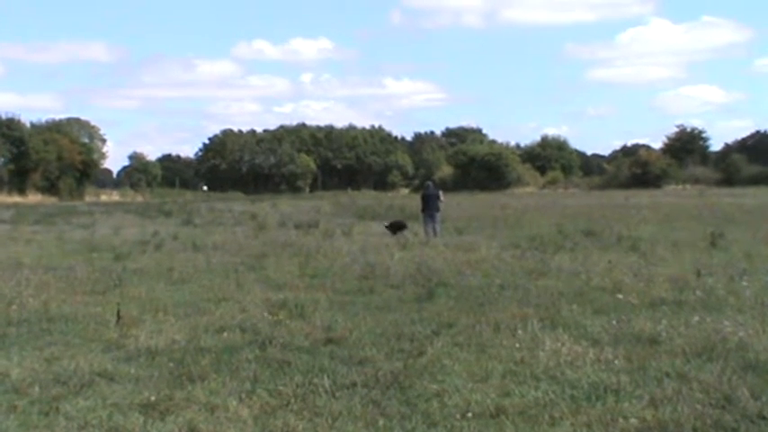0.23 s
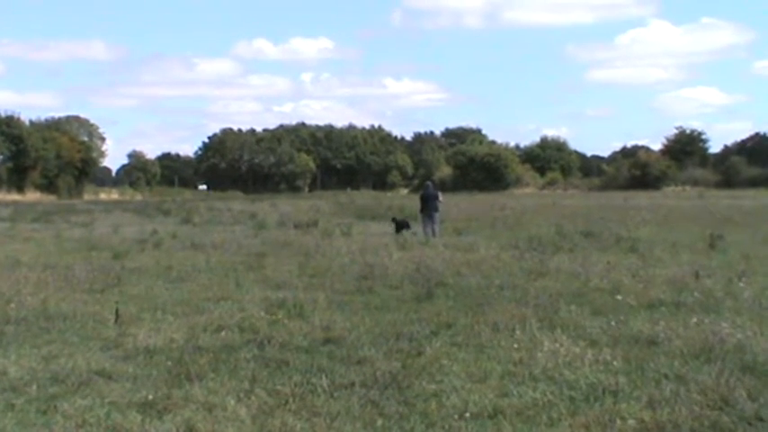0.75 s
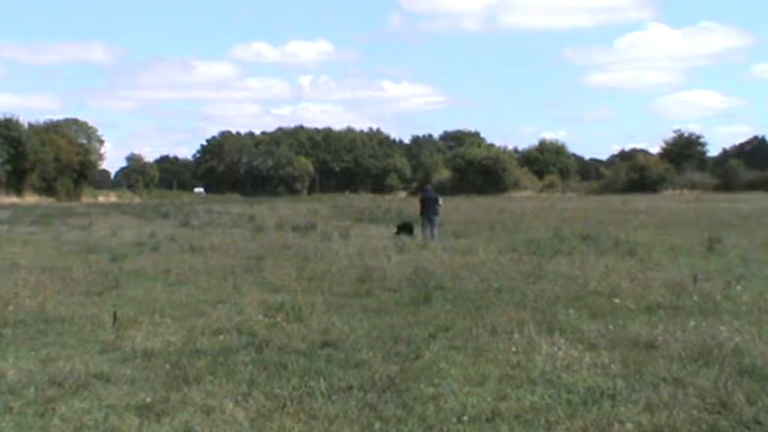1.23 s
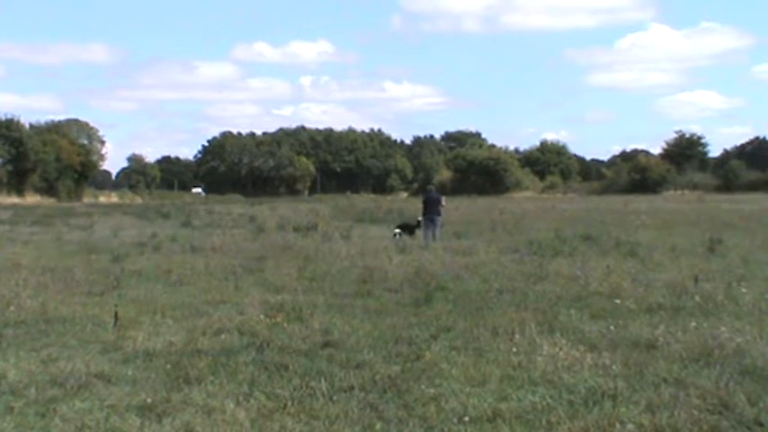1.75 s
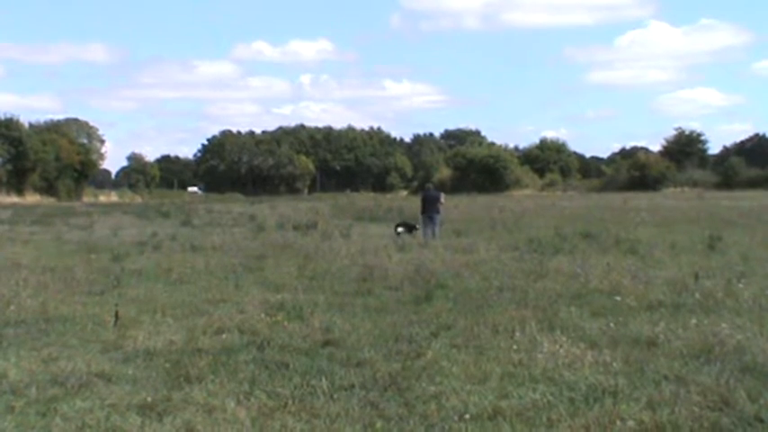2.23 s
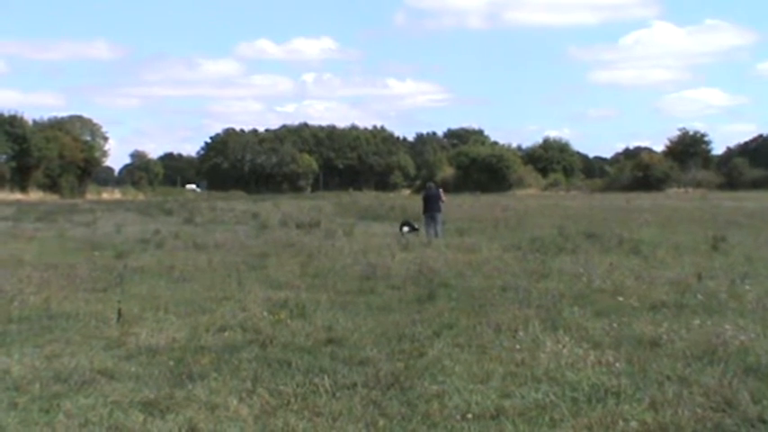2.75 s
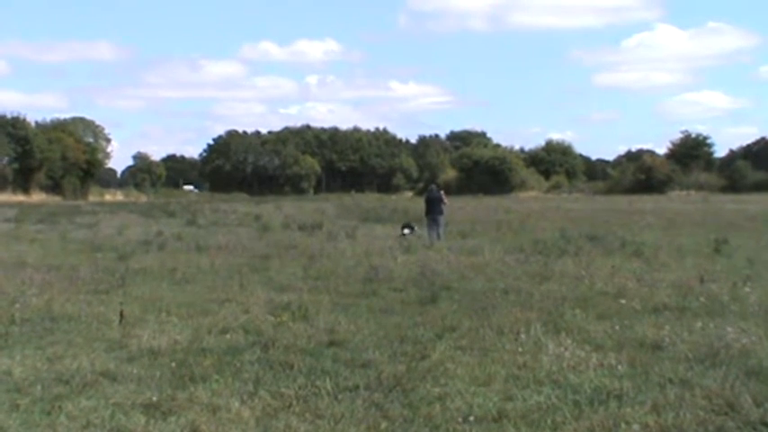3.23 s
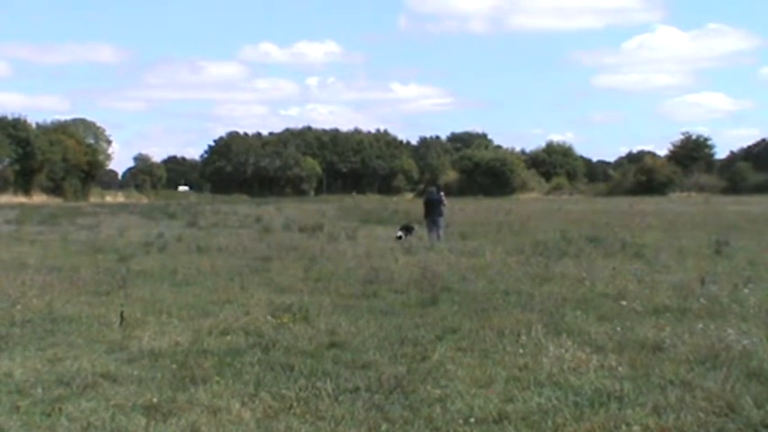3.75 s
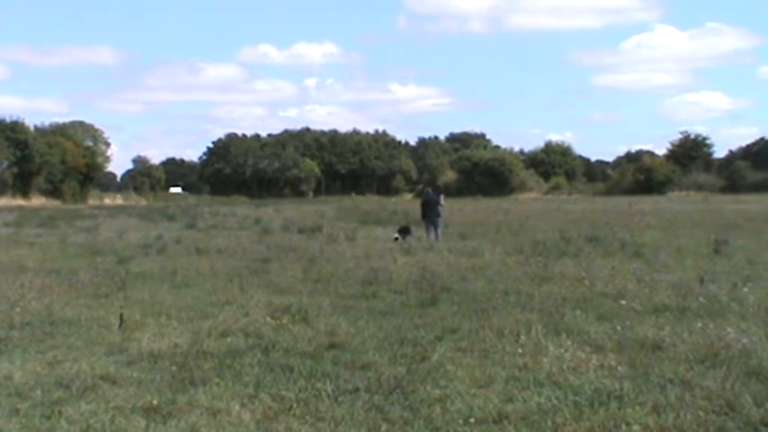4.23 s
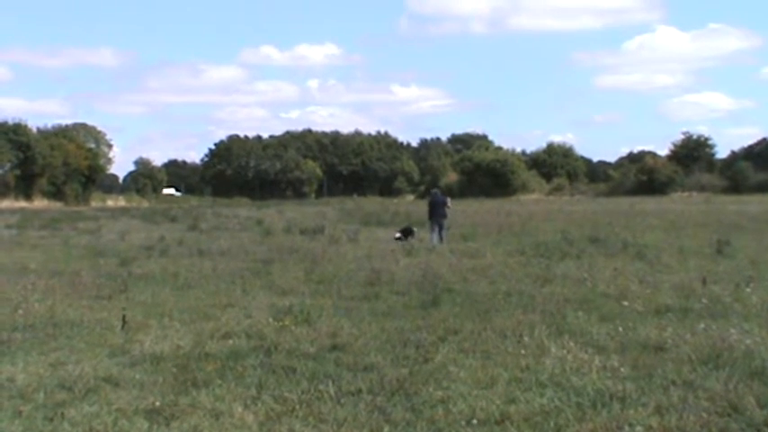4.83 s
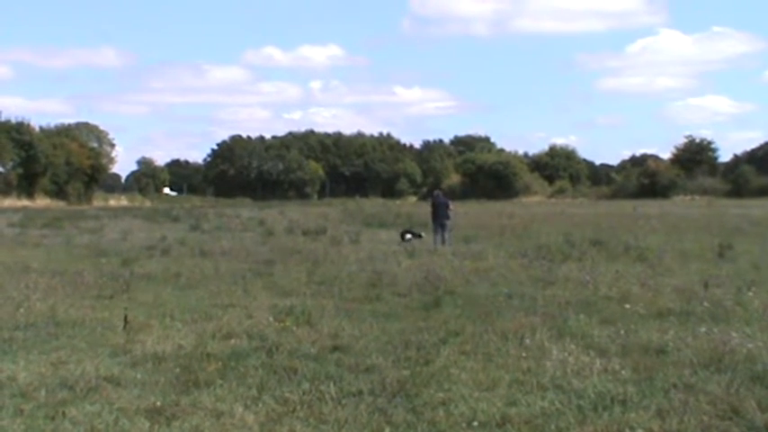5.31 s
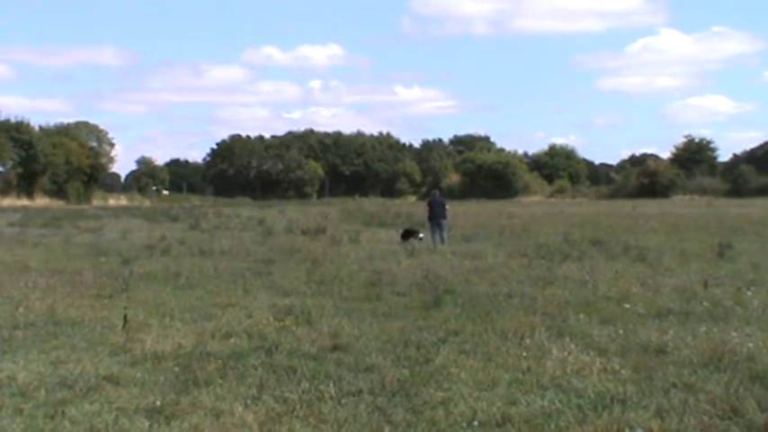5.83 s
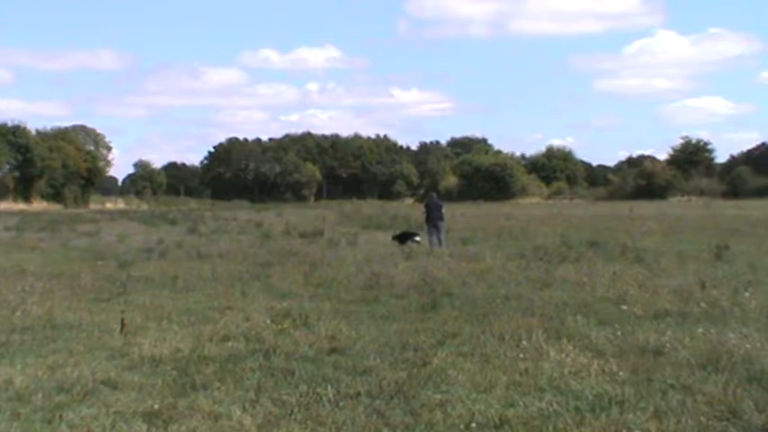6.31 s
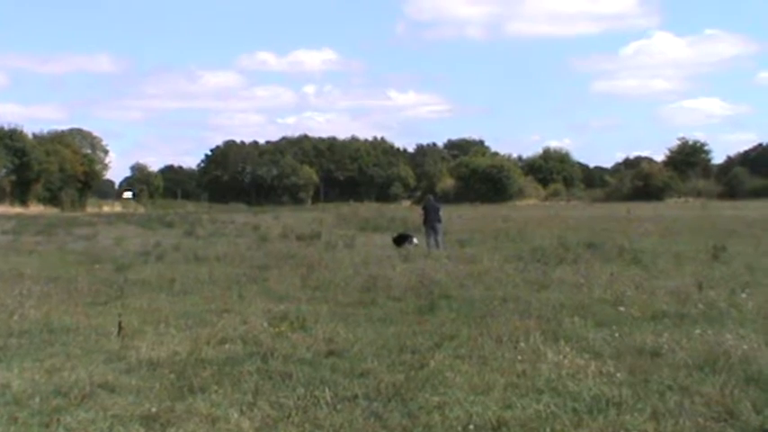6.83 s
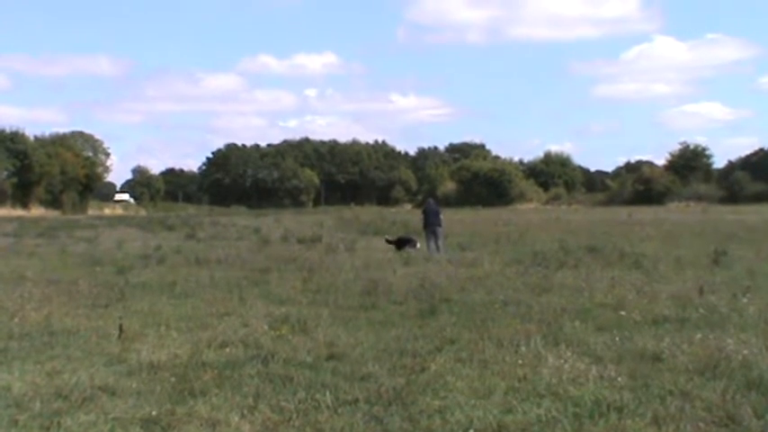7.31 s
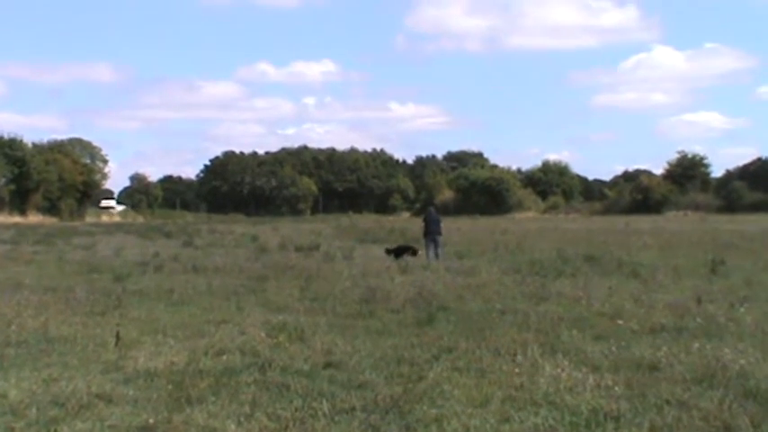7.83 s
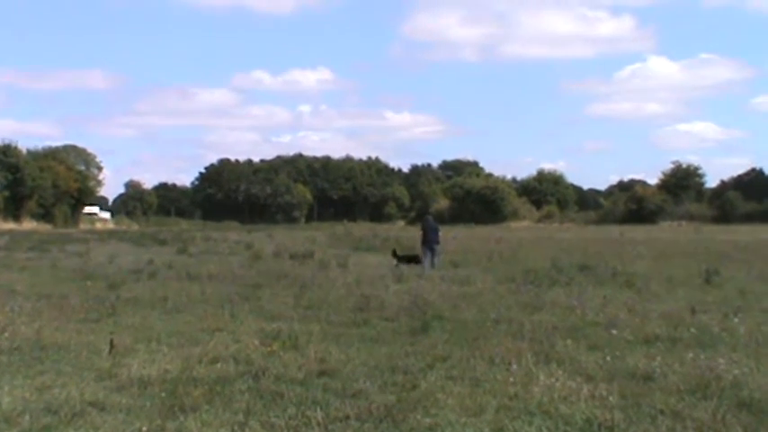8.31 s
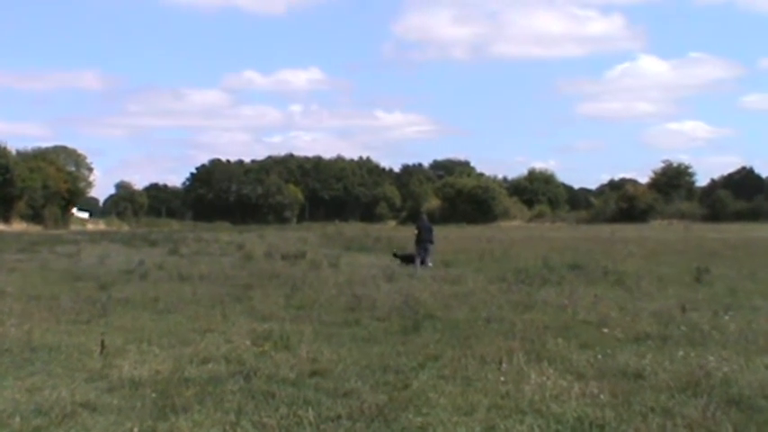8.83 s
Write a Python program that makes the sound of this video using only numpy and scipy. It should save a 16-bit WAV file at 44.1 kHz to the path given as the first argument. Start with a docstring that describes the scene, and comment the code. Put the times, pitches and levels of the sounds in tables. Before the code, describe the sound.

Gusty wind buffets the microphone, then eases, leaving a faint distant roar, hissing grass and a grasshopper's soft chirring.

```python
"""An open grassy field: gusts buffet a camera's microphone, then die down.
Right at the microphone, eddies thump across its two ports over a lumpy rumble. Far off lies a faint roar
of trees and a road with a drone of tyres, hollowed by its reflection off the ground. Nearer, the grass
hisses, and a little to the right a grasshopper rasps leg on wing in three runs over more distant insects.
The camera adds a thin whine of its own."""
import sys
import numpy as np
from scipy import signal
from scipy.fft import rfft, irfft
from scipy.io import wavfile
from scipy.ndimage import uniform_filter1d

SR = 44100
rng = np.random.default_rng(int(sys.argv[2]) if len(sys.argv) > 2 else 0)


def transcribe(signal):
    """Save signal, clipped to [-1, 1], as a 16-bit WAV file at the path in sys.argv[1]."""
    frames = np.atleast_2d(signal).T
    limited = np.clip(frames, -1, 1)
    pcm = np.round(limited * 32767).astype(np.int16)
    wavfile.write(sys.argv[1], SR, pcm)


N = 399546
TIME = np.arange(N) / SR
BINS = np.fft.rfftfreq(N, 1 / SR)

# Levels in the tables are relative: each source sets its own gain on top of them.
# how the two ports hear the field, the insects and the wind on the microphone:
# (frequency [Hz], left-right likeness [0-1], lead of the left port [rad])
FIELD_PORTS = [(100, 1, -0.098), (302, 0.72, 0.61), (474, 0.15, 0.99), (720, 0.99, 0.44), (925, 0.83, 0.79),
               (1110, 1, 0.86), (2200, 0.67, 0.25), (3430, 0.71, 1), (6000, 0.17, 0.17),
               (10300, 0.32, 0.36), (12700, 0.83, -0.69), (15500, 0.84, 0)]
INSECT_PORTS = [(5000, 1, 0.27), (11000, 0.99, -.1)]
WIND_PORTS = [(30, 1, 0.2), (101, 0.99, 0.38), (199, 0.69, 1.07), (540, 0.67, 2.14), (1000, 0.39, 2)]

# far roar of trees and road, notched by the ground reflection: (frequency [Hz], level [dB])
ROAR_COLOUR = [(60, -13.5), (280, -7.5), (400, -10.5), (530, -8.5), (680, -2), (790, -1.5), (930, -7),
               (1100, 0), (1260, -2), (1550, -8.5), (2300, -10.5), (2620, -18), (3600, -24.5),
               (6000, -24.5)]
# middle band of that roar: (time [s], level [dB])
ROAR_MID_LEVEL = [(0, -52), (1.3, -47.5), (2.8, -51.5), (3.8, -48.5), (4.9, -51.5), (5.6, -58.5),
                  (6.4, -50), (7.1, -54.5), (8.05, -54.5), (9.05, -51)]
# swells of the road's low hum and the trees' high rush: (peak time [s], half-width [s], level [dB])
ROAD_SWELLS = [(0.1, 0.47, -54), (1.3, 0.37, -58), (2.75, 0.81, -50), (3.95, 0.18, -52),
               (4.53, 0.34, -50.5), (6.6, 0.68, -54), (8.6, 0.32, -56.5)]
TREE_SWELLS = [(1.6, 0.94, -50), (2.95, 0.2, -51.5), (3.55, 0.52, -49.5), (4.6, 0.67, -50.5),
               (6.4, 1, -55.5), (8.45, 0.87, -53)]
# drone of tyres on the far road: (time [s], pitch [Hz])
TYRE_PITCH = [(0, 734), (2.4, 725), (3.05, 792), (4.5, 729), (6.3, 792.6), (8.6, 703)]
# buzz of distant insects: (frequency [Hz], level [dB])
BUZZ_COLOUR = [(4000, -21), (6200, -6), (7200, -0.5), (8300, -0.5), (10000, -1), (14000, -14.5)]
# bouts of that buzz: (start [s], length [s], level [dB])
BUZZ_BOUTS = [(0.05, 0.12, -62.5), (2.25, 1.25, -63.5), (5.3, 1.1, -64), (7.2, 2.4, -63.5),
              (8.7, 0.46, -57.5)]

# hiss of the grass all round and rustle of the nearest stems: (frequency [Hz], level [dB])
GRASS_COLOUR = [(1500, -6.5), (3000, -3.5), (5300, -7.5), (7500, -3.5), (10000, -1), (13500, 1.5),
                (15000, -2.5), (16000, -4)]
STEM_COLOUR = [(1000, -24), (2000, 7), (3000, 4), (4200, -12), (8000, -28)]
# waves of wind through the grass: (peak time [s], half-width [s], level [dB])
GRASS_WAVES = [(0.86, 0.09, -58), (1.15, 0.68, -69), (1.68, 0.11, -57.5), (2.7, 0.11, -57.5),
               (3.3, 0.14, -60.5), (6.25, 0.13, -59.5)]
# grasshopper's runs of leg strokes: (first stroke [s], last stroke [s], rate [1/s], opening level [dB])
STROKE_RUNS = [(4.694, 5.946, 16.8, -54), (6.043, 6.668, 16, -47), (8.002, 9.022, 16.7, -54.5)]
# its sharp down-stroke and duller return: (frequency [Hz], level [dB])
DOWN_STROKE_COLOUR = [(3000, -37), (5000, -23), (6500, -14), (7400, 0), (9300, -5), (11000, -8.5),
                      (16000, -1.5)]
RETURN_COLOUR = [(3000, -15), (4800, -9), (5700, 2), (6600, -2.5), (8000, -1), (11000, -5), (16000, -17)]

# rumble on the microphone in light air and in a full gust: (frequency [Hz], level [dB])
LIGHT_AIR_COLOUR = [(10, -46), (25, 1), (55, 4), (100, 1), (160, -6), (250, -18.5), (400, -24), (3000, -77)]
FULL_GUST_COLOUR = [(22, -35), (55, -2), (120, 1), (200, -4), (320, -11.5), (600, -21.5), (1200, -35),
                    (2500, -52), (6000, -85)]
# breeze at the microphone between gusts: (time [s], level [dB])
BREEZE_LEVEL = [(0, -43), (1.9, -38), (2.45, -44.5), (3.0, -40.5), (3.55, -39.5), (3.9, -49), (4.45, -58),
                (4.75, -46), (5.65, -53), (8.0, -52), (9.05, -51.5)]
# gusts on top of the breeze: (start [s], length [s], level [dB])
GUSTS = [(0.35, 0.063, -30.5), (0.53, 0.14, -39), (0.9, 0.88, -32.5), (1.335, 0.013, -21.5),
         (2.04, 0.063, -21), (2.164, 0.011, -23.5), (2.25, 0.063, -27), (2.635, 0.2, -33.5),
         (3.235, 0.093, -29.5), (3.33, 0.24, -41.5), (4.06, 0.28, -46.5), (4.57, 0.1, -45.5),
         (5.3, 0.12, -48), (8.82, 0.13, -47)]
# strongest eddies to hit the ports; small ones are centred higher:
# (time [s], level [dB], centre [Hz], steepness of the front [0-1])
EDDIES = [(0.13, -25.5, 146, 0), (0.286, -23, 107, 0), (0.372, -22, 147, 0), (0.487, -17.5, 136, 0.13),
          (0.548, -19, 105, 0), (0.83, -27.5, 122, 0), (0.912, -21, 150, 0), (1.036, -16, 206, 0.33),
          (1.08, -26.5, 317, 1), (1.245, -17.5, 187, 0.46), (1.349, -21.5, 160, 0.9),
          (1.507, -16.5, 141, 0.1), (1.734, -20, 131, 0.26), (1.796, -24.5, 179, 0), (1.918, -18, 131, 0.2),
          (1.967, -21.5, 124, 0.2), (2.061, -14.5, 220, 0.46), (2.092, -13, 260, 0.53),
          (2.124, -22.5, 285, 1), (2.178, -11.5, 246, 0.06), (2.26, -17, 101, 0.15), (2.356, -26.5, 151, 0),
          (2.664, -18, 139, 0.26), (2.783, -25, 136, 0.1), (2.916, -22.5, 94, 0.13),
          (3.243, -13, 118, 0.32), (3.285, -19.5, 80, 0.15), (4.078, -28.5, 129, 0.04),
          (4.249, -31, 104, 0), (4.575, -28.5, 102, 0.2), (4.614, -22, 102, 0.1), (6.202, -21.5, 163, 0.12),
          (6.24, -31, 90, 0.2), (6.307, -26, 104, 0), (8.021, -33.5, 98, 0)]


def gain_of(db):
    """Decibels to amplitude."""
    return 10 ** (np.asarray(db) / 20)


def unit_rms(x):
    """Scales to an rms of one."""
    return x / np.sqrt(np.mean(x ** 2) + 1e-20)


def over_time(rows):
    """A curve's value at every sample."""
    return np.interp(TIME, *np.transpose(rows))


def over_bins(rows):
    """Each column of a spectrum, at every frequency."""
    hz, *columns = np.transpose(rows)
    return [np.interp(np.log(BINS + 1), np.log(hz + 1), column) for column in columns]


def wander(rate_hz):
    """Smooth random motion of rms one, rolled off above the rate."""
    return unit_rms(irfft(rfft(rng.standard_normal(N)) * np.exp(-(BINS / rate_hz) ** 2), N))


def port_noise(colour, ports):
    """Coloured noise as the two ports hear it: partly alike, and shifted in phase."""
    left, unrelated = rfft(rng.standard_normal((2, N)))
    likeness, lead = over_bins(ports)
    likeness = np.clip(likeness, -1, 1)
    right = (likeness * left + np.sqrt(1 - likeness ** 2) * unrelated) * np.exp(-1j * lead)
    return unit_rms(irfft(np.array([left, right]) * gain_of(over_bins(colour)[0]), N))


def steadied(x, window_s):
    """Takes the slow chance swells out of a noise and leaves its quick lumps."""
    power = uniform_filter1d(np.mean(x ** 2, axis=0), int(window_s * SR))
    return x / np.sqrt(np.abs(power) + 1e-12)


def bouts_db(rows, calm_db, attack_s, release_s):
    """Level of bouts that rise, hold and die away over a calm level."""
    power = gain_of(calm_db) ** 2
    for start, length, db in rows:
        rise = np.clip(1 + (TIME - start) / attack_s, 0, 1)
        fall = np.exp(-np.clip((TIME - start - length) / release_s, 0, 20))
        power = power + (gain_of(db) * rise * fall) ** 2
    return 10 * np.log10(power)


def swells_db(rows, calm_db):
    """Level of bell-shaped swells over a calm level."""
    power = gain_of(calm_db) ** 2
    for peak_s, width_s, db in rows:
        power = power + gain_of(db) ** 2 * np.exp(-np.minimum(((TIME - peak_s) / width_s) ** 2, 20))
    return 10 * np.log10(power)


def far_roar(road_below_hz=930, trees_above_hz=1550, trim_db=3.5):
    """Far off, the road's low hum and the rush of wind in trees swell on their own around a middle band."""
    roar = rfft(port_noise(ROAR_COLOUR, FIELD_PORTS))
    low = 1 / (1 + (BINS / road_below_hz) ** 16)
    high = 1 - 1 / (1 + (BINS / trees_above_hz) ** 10)
    bands = [(low, swells_db(ROAD_SWELLS, calm_db=-53)),
             (1 - low - high, over_time(ROAR_MID_LEVEL)),
             (high, swells_db(TREE_SWELLS, calm_db=-55))]
    return sum(irfft(roar * share, N) * gain_of(db + trim_db) for share, db in bands)


def tyre_drone(width_hz=64, left_lead_rad=0.9, trim_db=-3.5):
    """Tyres on the far road sing a hollow, fuzzy note that drifts as the vehicles pass."""
    turns = np.cumsum(over_time(TYRE_PITCH)) / SR
    note = (wander(width_hz) + 1j * wander(width_hz)) * np.exp(2j * np.pi * turns)
    at_ports = (note * np.exp(1j * np.array([[left_lead_rad], [0]]))).real
    return at_ports * gain_of(swells_db(ROAD_SWELLS, calm_db=-np.inf) + trim_db)


def far_insects(rasp_db=3.5):
    """Insects farther out in the field: an even, high buzz that comes and goes."""
    level_db = bouts_db(BUZZ_BOUTS, calm_db=-82, attack_s=0.24, release_s=0.085)
    return port_noise(BUZZ_COLOUR, INSECT_PORTS) * gain_of(level_db + rasp_db * wander(130))


def grass(grain_db=2.0, trim_db=4.5):
    """Grass all round hisses in waves of wind, with a slight grain of brushing blades."""
    level_db = swells_db(GRASS_WAVES, calm_db=-59) + trim_db
    return port_noise(GRASS_COLOUR, FIELD_PORTS) * gain_of(level_db + grain_db * wander(500))


def near_stems(peak_s=1.65, width_s=0.26, level_db=-57, grain_db=2):
    """A gust stirs the stems nearest the microphone into a soft, airy swell."""
    swell = 1 / (1 + ((TIME - peak_s) / width_s) ** 2)
    return port_noise(STEM_COLOUR, FIELD_PORTS) * swell * gain_of(level_db + grain_db * wander(200))


def grasshopper(crescendo_db_per_s=7, full_effort_db=-46.8, light_touch_db=-57, return_db=-11.0):
    """A leg file scrapes the wing: a short down-stroke that brightens with effort, then a longer return."""
    rise_s, fall_s = 0.0025, 0.0055
    return_at, return_width = 0.46, 0.31  # shares of one stroke cycle
    down, back, effort = np.zeros((3, N))
    for first, last, rate, opening_db in STROKE_RUNS:
        for stroke_s in np.linspace(first, last, round((last - first) * rate) + 1):
            near = slice(int((stroke_s - 1 / rate) * SR), int((stroke_s + 2 / rate) * SR))
            t = TIME[near] - stroke_s
            down[near] += np.exp(-(t / np.where(t < 0, rise_s, fall_s)) ** 2)
            back[near] += np.exp(-((t * rate - return_at) / return_width) ** 2)
            effort_db = opening_db + crescendo_db_per_s * (stroke_s - first)
            effort[near] = gain_of(min(effort_db, full_effort_db))
    bright = port_noise(DOWN_STROKE_COLOUR, INSECT_PORTS)
    dull = port_noise(RETURN_COLOUR, INSECT_PORTS)
    ticks = down * (effort * bright + gain_of(light_touch_db) * dull)
    return ticks + effort * back * dull * gain_of(return_db)


def rumble(light_air_db=-50, full_gust_db=-29, light_lumps_db=2, gust_lumps_db=3, trim_db=-1):
    """Turbulence right on the ports: faster air brings smaller eddies, so it is brighter and burstier."""
    level_db = bouts_db(GUSTS, calm_db=over_time(BREEZE_LEVEL), attack_s=0.012, release_s=0.028)
    force = np.clip((level_db - light_air_db) / (full_gust_db - light_air_db), 0, 1) ** 2
    bursts = wander(30)
    light_air = unit_rms(port_noise(LIGHT_AIR_COLOUR, WIND_PORTS) * gain_of(light_lumps_db * bursts))
    full_gust = unit_rms(port_noise(FULL_GUST_COLOUR, WIND_PORTS) * gain_of(gust_lumps_db * bursts))
    blend = np.sqrt(1 - force) * light_air + np.sqrt(force) * full_gust
    return gain_of(level_db + trim_db) * steadied(blend, window_s=0.16)


def vortex(t, hz, phase_turns):
    """Pressure of a passing swirl: steep at its core, with soft skirts."""
    return (np.exp(2j * np.pi * phase_turns) * (1 - 2j * np.pi * hz * t / 2.5) ** -3).real


def buffets(crossing_turns=0.15, front_hz=480, wake_db=-11, low_cut_hz=36, trim_db=2.0):
    """Each eddy pushes and pulls on the left port, then on the right; small ones cross sooner."""
    pressure = np.zeros((2, N))
    for at_s, db, hz, steepness in EDDIES:
        lean, phase_ahead, phase_behind, slant = rng.random(4)
        near = slice(max(int((at_s - .05) * SR), 0), int((at_s + .05) * SR))
        crossing_s = crossing_turns / hz * (.75 + slant / 2)
        t = TIME[near] - at_s + np.array([[.5], [-.5]]) * crossing_s
        # a steep front adds a short slap to the thump
        core = vortex(t, hz, lean / 4) + steepness * vortex(t, front_hz, lean / 4)
        # slower swirls roll one turn ahead of it and behind it
        wake = vortex(t + 1 / hz, hz * .7, phase_ahead) + vortex(t - 1 / hz, hz / 2, phase_behind)
        pressure[:, near] += gain_of(db + trim_db) * (core + gain_of(wake_db) * wake)
    return signal.sosfilt(signal.butter(1, low_cut_hz, "high", fs=SR, output="sos"), pressure)


def tearing(wind, low_hz=360, high_hz=1150, onset_db=-15, level_db=-28.0):
    """Where the pressure changes fastest the air tears at the ports in a rough blast."""
    smooth = signal.sosfilt(signal.butter(2, 500, fs=SR, output="sos"), wind)
    slope = np.gradient(smooth, axis=1) * SR / (2 * np.pi * 200)  # unity gain at 200 Hz
    drive = abs(slope) / gain_of(onset_db)
    shreds = np.tanh(drive ** 2 * np.minimum(drive, 1)) * rng.standard_normal((2, N))
    band = signal.butter(3, [low_hz, high_hz], "band", fs=SR, output="sos")
    band_makeup = np.sqrt(SR / 2 / (high_hz - low_hz))
    return gain_of(level_db) * band_makeup * signal.sosfilt(band, shreds)


def scene(wind_right_db=0.5, insects_right_db=4):
    """Wind on the microphone over the sounds of the field; the insects sit a little to the right."""
    rightward = np.array([[-.5], [.5]])
    wind = (rumble() + buffets()) * gain_of(wind_right_db * rightward)
    insects = (grasshopper() + far_insects()) * gain_of(insects_right_db * rightward)
    field = far_roar() + tyre_drone() + grass() + near_stems() + insects
    return field + wind + tearing(wind)


def record(dry, whine_hz=15625, whine_db=-73, picture_rate_hz=50, band_limit_hz=15850):
    """The camera adds a thin electronic whine that flutters at its picture rate, then limits the band."""
    flutter = 1 + np.cos(2 * np.pi * picture_rate_hz * TIME)
    whine = gain_of(whine_db) * np.sqrt(2) * np.sin(2 * np.pi * whine_hz * TIME)
    low_pass = signal.firwin(1023, band_limit_hz, window=("kaiser", 9), fs=SR)
    return signal.oaconvolve(dry + flutter * whine, low_pass[None], "same")


dry = scene()
out = record(dry)
transcribe(out)
```